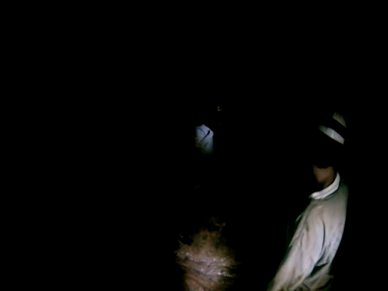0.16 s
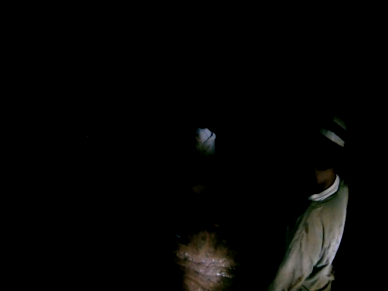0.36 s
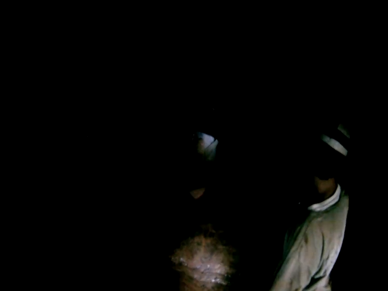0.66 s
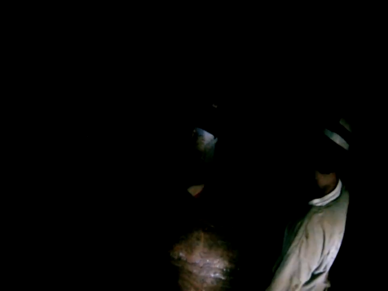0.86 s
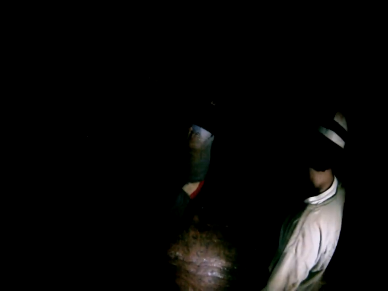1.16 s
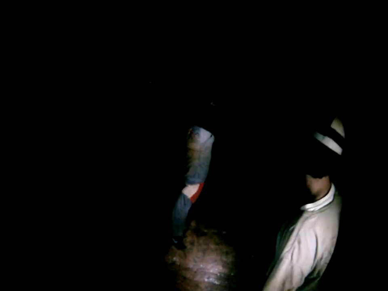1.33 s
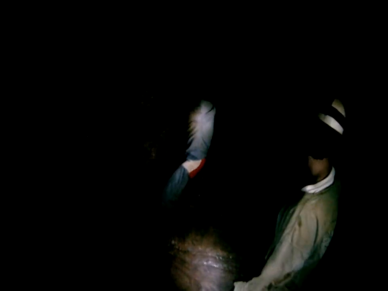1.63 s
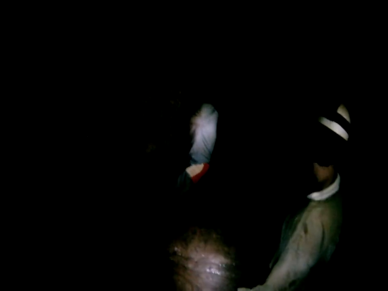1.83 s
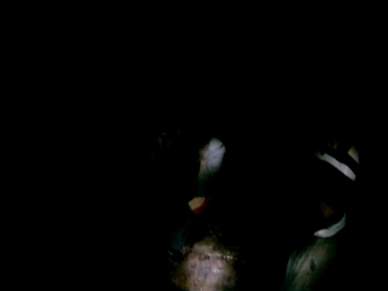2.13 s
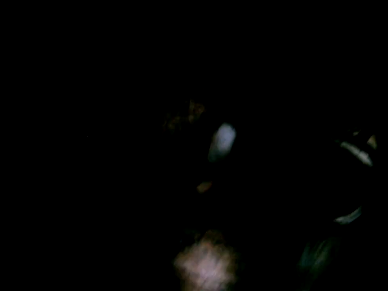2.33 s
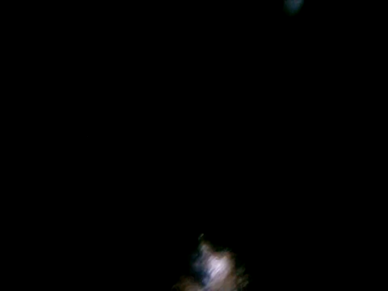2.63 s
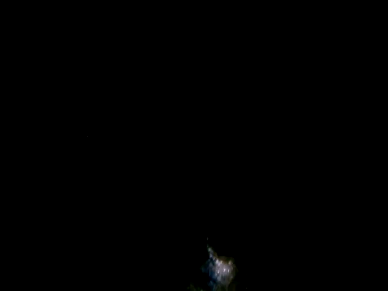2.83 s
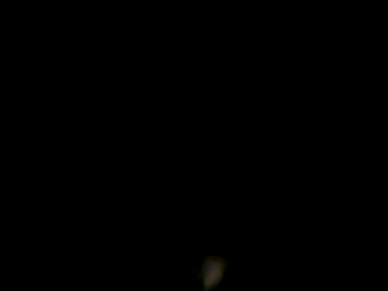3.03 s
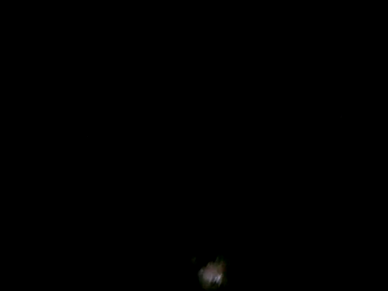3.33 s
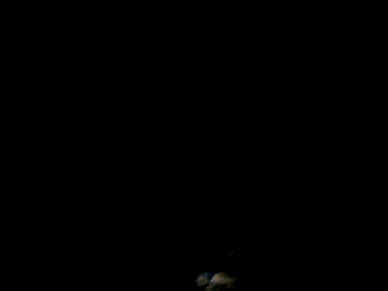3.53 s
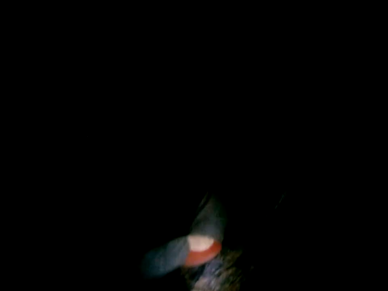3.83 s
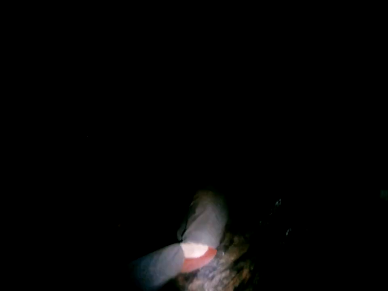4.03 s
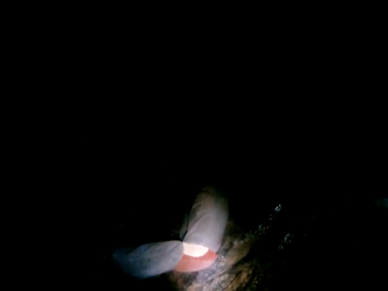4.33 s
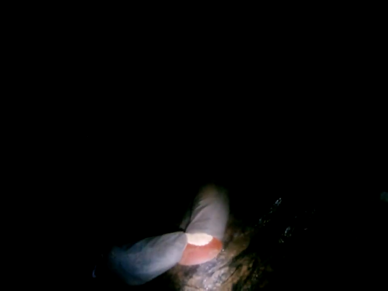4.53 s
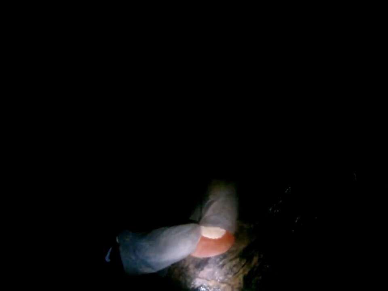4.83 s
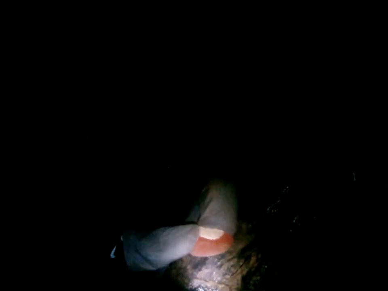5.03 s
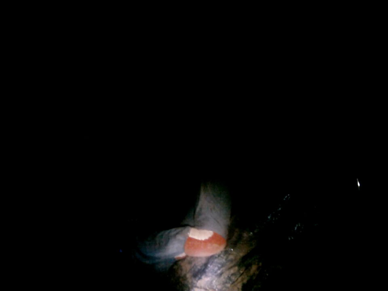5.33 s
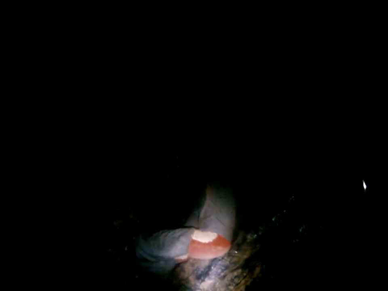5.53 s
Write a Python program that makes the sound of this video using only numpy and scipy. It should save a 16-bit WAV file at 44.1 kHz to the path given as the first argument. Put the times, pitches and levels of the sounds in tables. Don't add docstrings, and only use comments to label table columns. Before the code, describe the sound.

Close, muffled running water with a coarse, low-quality treble fizz stays constant throughout. A burst of scrape, thud and two hard plastic-on-stone cracks opens it, trailing into small scuffs. Low mount thumps follow within the first second. Afterwards a crawling person's weight shifts give weak, irregular rumbles and a few faint thuds, settling into almost nothing but water near the end.

```python
import sys
import numpy as np
from scipy import signal
from scipy.fft import rfft, irfft, next_fast_len
from scipy.io import wavfile
from scipy.ndimage import uniform_filter1d, map_coordinates

SR = 44100
rng = np.random.default_rng(int(sys.argv[2]) if len(sys.argv) > 2 else 0)


def store_pcm(level_fs):
    pcm = np.round(np.clip(level_fs, -1, 1) * 32767).astype(np.int16)
    wavfile.write(sys.argv[1], SR, np.atleast_2d(pcm).T)


def field_ratio(decibels):
    return 10 ** (np.asarray(decibels, dtype=float) / 20)


N = 250576


def unit(x):
    return x / np.sqrt(np.mean(x ** 2) + 1e-20)


def along(points, hz):
    f, value = np.transpose(points)
    return np.interp(np.log(hz + 1), np.log(f + 1), value)


def wobble(rate):
    knots = rng.standard_normal(int(N * rate / SR) + 4)
    return map_coordinates(knots, [np.arange(N) * rate / SR])


def filtered(x, response):
    m = next_fast_len(N + SR // 2)
    return irfft(rfft(x, m) * response(np.fft.rfftfreq(m, 1 / SR)), m)[:N]


def resonance(hz, centre, width):
    return 1j * hz * width / (centre ** 2 - hz ** 2 + 1j * hz * width)


def add(track, s, sound):
    part = track[round(s * SR):][:len(sound)]
    part += sound[:len(part)]


def movement_gain(s, hold, db, rise_db_per_s, fall_db_per_s):
    t = np.arange(N) / SR - s
    swell_db = rise_db_per_s * t
    fade_db = fall_db_per_s * (hold - t)
    return field_ratio(db + np.minimum(0, np.minimum(swell_db, fade_db)))


# centre f/Hz, width/Hz, level/dB
CASE_MODES = [(1158, 305, -3), (1465, 114, -7.5), (2056, 590, -2.5), (2550, 220, -10), (2730, 310, -8),
              (2900, 77, -13.5), (3210, 100, -13), (3390, 300, -12.5), (3650, 255, -5), (3870, 116, -7),
              (4340, 220, -14), (4960, 410, -6), (5500, 200, -34)]


def case_gain(hz, leak_db=-12):
    power = field_ratio(2 * leak_db)
    for centre, width, db in CASE_MODES:
        power = power + np.abs(field_ratio(db) * resonance(hz, centre, width) ** 2) ** 2
    return np.sqrt(power)


# t/s, level/dB
STREAM_LEVEL = [
    (0.03, -36.5),
    (0.09, -39),
    (3.55, -39),
    (3.79, -38.5),
    (4.91, -39.5),
    (5.68, -38.5),
]
# f/Hz, level/dB per Hz
WATER_COLOUR = [(100, -11.5), (200, -13), (400, -13), (800, -12), (1600, -13), (3000, -7), (4300, -14),
                (5500, -12.5), (6000, -17)]


def stream(patchy_db=0.5, splash_db=-8):
    spectrum = signal.stft(rng.standard_normal(N), nperseg=512)[2]
    patches = rng.standard_normal(spectrum.shape)
    patches = unit(uniform_filter1d(uniform_filter1d(patches, 8, 0), 8, 1))
    rush = unit(signal.istft(spectrum * field_ratio(patchy_db * patches), nperseg=512)[1][:N])
    hits = rng.random(N) < 900 / SR
    splashes = hits * rng.standard_normal(N) * field_ratio(1.3 * rng.exponential(size=N))
    water = rush + field_ratio(splash_db) * unit(splashes)
    heard = unit(filtered(water, lambda hz: field_ratio(along(WATER_COLOUR, hz)) * case_gain(hz)))
    s, level_db = np.transpose(STREAM_LEVEL)
    level_db = np.interp(np.arange(N) / SR, s, level_db)
    swell_db = 0.088 * wobble(4.4) + 0.14 * wobble(18) + 0.1 * wobble(90)
    return field_ratio(level_db + swell_db) * heard


def swing(db, hz, rise, t60):
    t = np.arange(-round(SR / 20), SR // 3) / SR
    build = np.exp(-.5 * (t / rise) ** 2)
    decay = field_ratio(-60 * np.abs(t) / t60)
    return -field_ratio(db) * np.where(t < 0, build, decay) * np.sin(2 * np.pi * hz * t)


# strongest t/s, peak level/dB, f/Hz, t60/s, overtone level/dB
THUMP_EVENTS = [(0.053, -21.5, 27.2, 0.16, -17), (0.099, -25.5, 89.5, 0.093, -12),
                (0.1111, -6.5, 137, 0.016, -38), (.131, -24, 79.4, 0.056, -9), (0.145, -22, 69, 0.029, -13),
                (0.369, -33.5, 39.4, 0.064, -33), (0.7226, -10.5, 82.4, 0.11, -32),
                (0.7546, -17.5, 97, 0.064, -19), (0.787, -27, 80, 0.063, -23), (0.809, -39, 70, 0.052, -25),
                (0.897, -22, 59.8, 0.11, -24), (0.922, -19.5, 55.3, 0.23, -20),
                (2.103, -31.5, 62, 0.061, -27), (2.601, -28, 38, 0.071, -23), (2.684, -35, 52, 0.35, -27),
                (3.039, -35, 73.4, 0.069, -20), (3.1, -37, 48, 0.13, -17), (3.645, -36, 49.6, 0.1, -29)]


def thumps():
    out = np.zeros(N)
    for s, db, hz, t60, over_db in THUMP_EVENTS:
        rise = min(.34 / hz, .095 * t60)
        overtone = swing(db + over_db, 3.11 * hz, rise, 0.71 * t60)
        add(out, s - 1 / 20, swing(db, hz, rise, t60) + overtone)
    return out


# t/s, length/s, level/dB, f/Hz
GRIND_STROKES = [
    (.086, .003, -30, 2400),
    (.0912, .0012, -19, 2700),
    (.0947, .002, -15, 2400),
    (.0975, .0025, -19, 2800),
    (.1013, .0016, -12, 2800),
    (.1035, .002, -12, 2450),
    (.1062, .0015, -20, 2200),
]


def grind():
    out = np.zeros(N)
    for s, length, db, hz in GRIND_STROKES:
        t = np.arange(round(1.6 * length * SR)) / SR
        drift = np.cumsum(rng.normal(0, .1, len(t)))
        chatter = np.sin(2 * np.pi * hz * t + drift)
        rasp = 0.63 * filtered(rng.standard_normal(len(t)), case_gain)[:len(t)]
        shape = np.sin(np.pi * (t / t[-1]) ** 0.55)
        add(out, s, field_ratio(db + 1.2) * shape * (chatter + rasp))
    return out


# t/s, hold/s, level/dB, centre f/Hz
DRAG_EVENTS = [
    (0.099, 0.0096, -29, 2240),
    (0.13, 0.044, -50, 2300),
    (0.19, 0.022, -38, 1600),
    (0.283, 0.03, -43.5, 2420),
    (0.335, 0.012, -36, 2900),
    (.73, 0.034, -45, 1600),
]


def drags():
    grit = rng.standard_normal(N) * field_ratio(3.0 * wobble(330))
    low = unit(filtered(grit, lambda hz: resonance(hz, 1560, 2140) ** 2))
    high = unit(filtered(grit, lambda hz: resonance(hz, 2910, 880) ** 2))
    broad = unit(filtered(grit, case_gain))
    dull = unit(filtered(grit, lambda hz: resonance(hz, 180, 850) ** 2))
    bite_db_per_s, lift_db_per_s = 702, 800
    out = np.zeros(N)
    for s, hold, db, hz in DRAG_EVENTS:
        share = np.clip((hz - 1700) / 1250, 0, 1)
        colour = np.sqrt(1 - share) * low + np.sqrt(share) * high
        colour = colour + field_ratio(1.0) * broad + field_ratio(-8.5) * dull
        out += movement_gain(s, hold, db, bite_db_per_s, lift_db_per_s) * colour
    return out


def ring(db, hz, t60):
    t = np.arange(SR // 3) / SR
    return field_ratio(db - 60 * t / t60) * np.sin(2 * np.pi * hz * t) * (1 - np.exp(-t / 0.0003))


# t/s, peak level/dB, f/Hz, t60/s
CRACK_EVENTS = [(0.111, -5, 3300, 0.0045), (.1175, -30, 3500, .01), (0.1285, -19, 2900, 0.009),
                (0.137, -27, 2800, 0.015), (.1434, -2.5, 3540, 0.0068), (0.167, -31, 2010, 0.013),
                (0.285, -31, 2840, .015), (.33, -30, 2750, 0.024), (.345, -30, 2950, .015),
                (.345, -36, 1193, 0.036), (1.682, -28, 2300, .01)]


def cracks():
    out = np.zeros(N)
    t = np.arange(SR // 3) / SR
    for s, db, hz, t60 in CRACK_EVENTS:
        snap = 0.3 * rng.standard_normal(len(t)) * field_ratio(db - 60 * t / (2.2 * t60))
        sides = ring(db - 7, 0.5 * hz, 1.3 * t60)
        sides -= ring(db - 2.5, .81 * hz, 0.75 * t60)
        sides += ring(db - 15, .33 * hz, 1.5 * t60)
        add(out, s, ring(db, hz, t60) + sides + filtered(snap, case_gain)[:len(snap)])
    return out


# f/Hz, level/dB per Hz
RUMBLE_COLOUR = [(8, -41), (15, 2), (30, -2.5), (45, -0.5), (57, 4), (70, -5), (95, -19.5), (130, -22.5),
                 (220, -52), (480, -120)]
# t/s, hold/s, level/dB
WEIGHT_SHIFTS = [(0.164, .02, -38), (0.237, .1, -41.5), (0.515, .03, -54), (.68, 0.37, -48.5),
                 (1.003, 0.18, -48.5), (1.2, 0.19, -53), (1.428, 0.05, -43), (1.592, 0.15, -50),
                 (1.842, 0.054, -48), (2.003, 0.12, -50), (2.276, 0.11, -50.5), (2.52, 0.041, -46),
                 (2.65, .1, -45), (2.81, 0.15, -46.5), (2.97, 0.12, -41), (3.167, 0.037, -48.5),
                 (3.283, 0.14, -48.5), (3.49, 0.17, -48), (3.703, 0.033, -50), (3.79, 0.25, -48.5),
                 (4.14, .02, -48), (4.25, 0.43, -57.5), (4.86, 0.35, -52), (5.328, .02, -54)]


def body():
    still_db, lean_in_db_per_s, settle_db_per_s = -80.5, 400, 250
    gains = [movement_gain(*row, lean_in_db_per_s, settle_db_per_s) for row in WEIGHT_SHIFTS]
    push = field_ratio(still_db) + np.max(gains, axis=0)
    shake = unit(filtered(rng.standard_normal(N), lambda hz: field_ratio(along(RUMBLE_COLOUR, hz))))
    power = uniform_filter1d(uniform_filter1d(shake ** 2, 1500), 1500)
    chance_swing = np.sqrt(np.abs(power) + .02)
    return push * unit(shake / chance_swing ** .7)


def scene():
    return (stream() + thumps() + grind() + drags() + cracks() + body())[None]


def roll_off(x):
    return signal.sosfilt(signal.butter(12, 16470, fs=SR, output="sos"), x)


def record(dry):
    slow = signal.resample_poly(dry, 40, 147, axis=1)
    steps = np.repeat(slow, 4, axis=1)
    held = signal.resample_poly(steps, 147, 160, axis=1)[0, :N]
    top_hz, start_s = 15290, .0333
    kept = filtered(held, lambda hz: hz < top_hz) * (np.arange(N) > start_s * SR)
    return roll_off(kept[None])


dry = scene()
out = record(dry)
store_pcm(out)
```